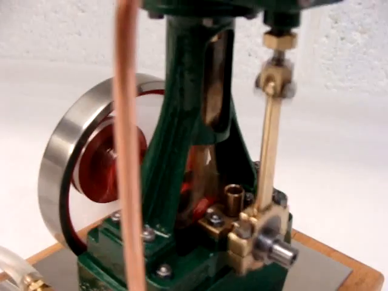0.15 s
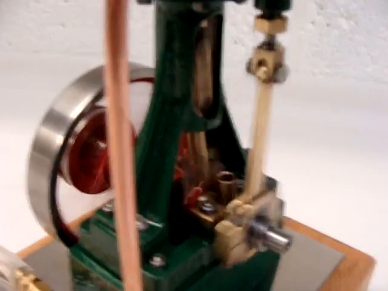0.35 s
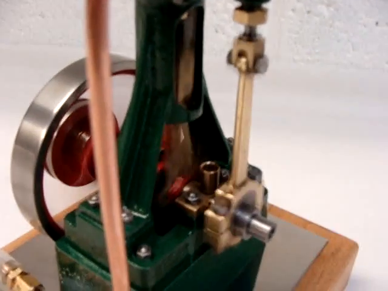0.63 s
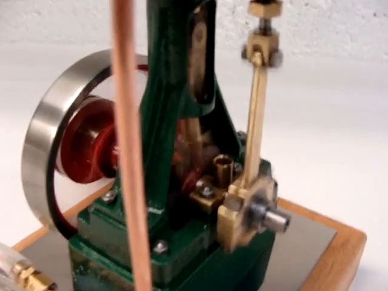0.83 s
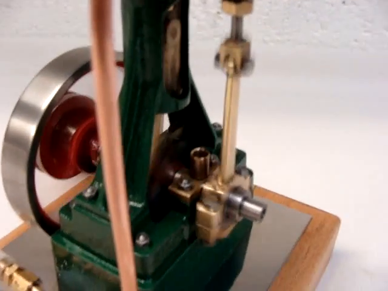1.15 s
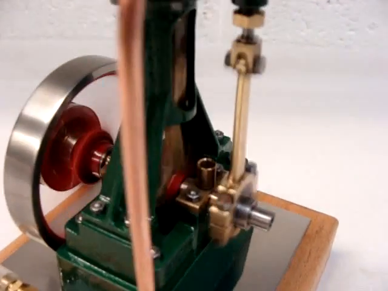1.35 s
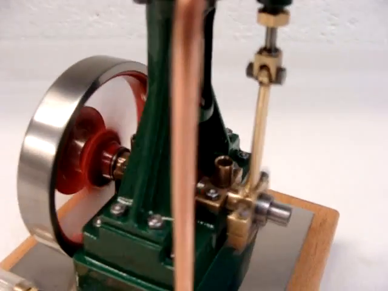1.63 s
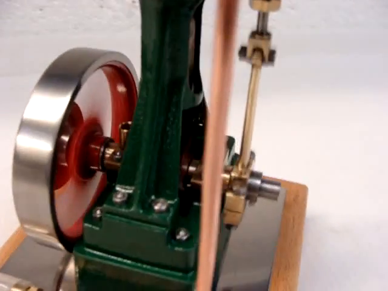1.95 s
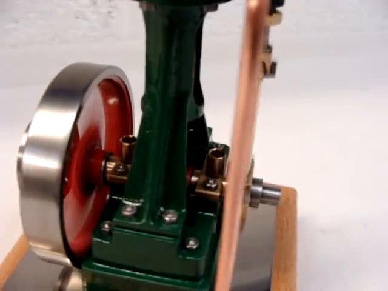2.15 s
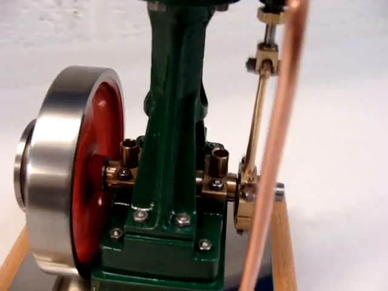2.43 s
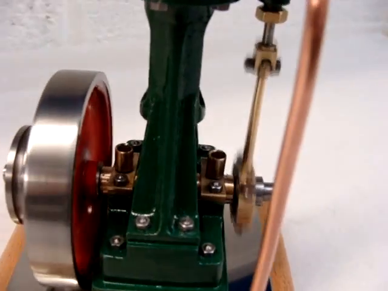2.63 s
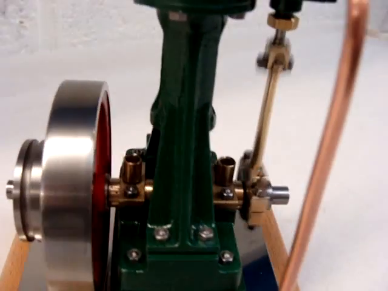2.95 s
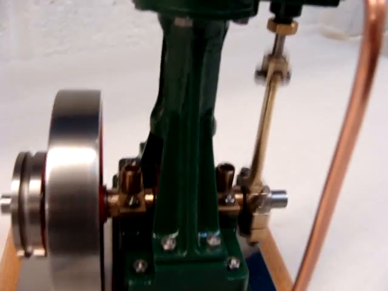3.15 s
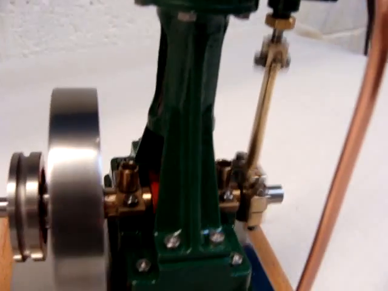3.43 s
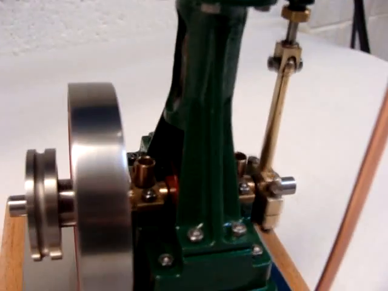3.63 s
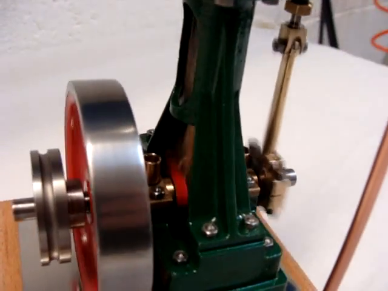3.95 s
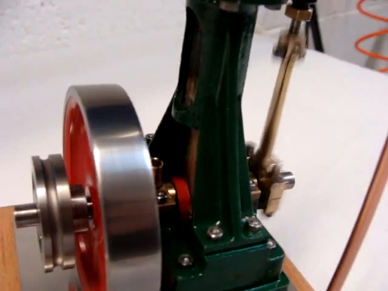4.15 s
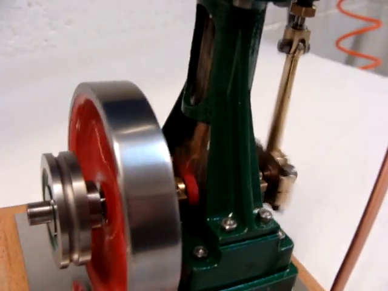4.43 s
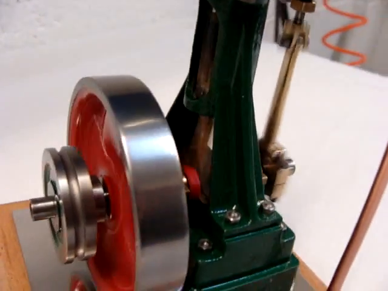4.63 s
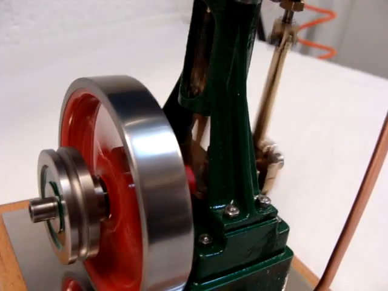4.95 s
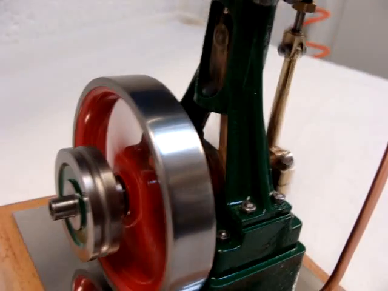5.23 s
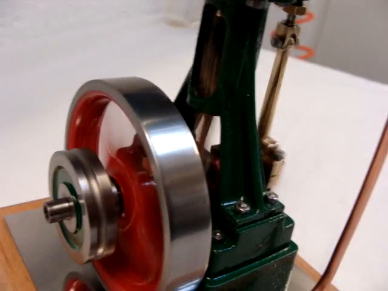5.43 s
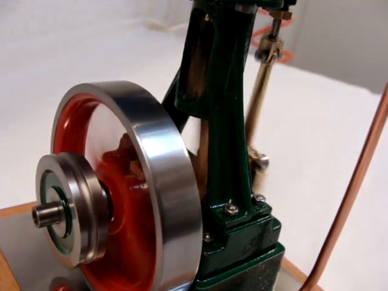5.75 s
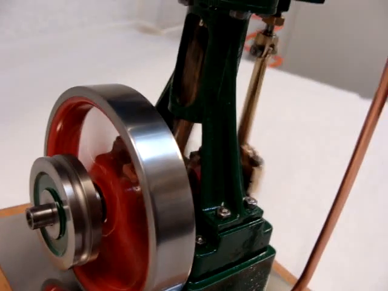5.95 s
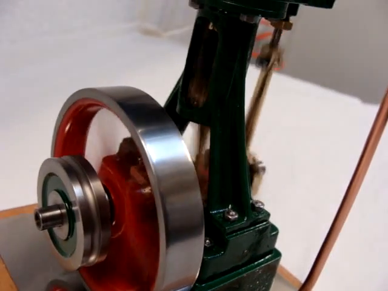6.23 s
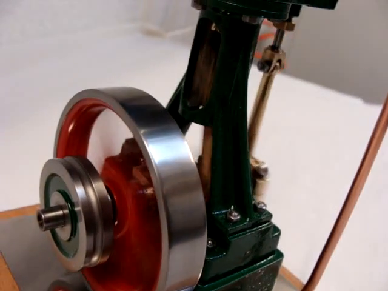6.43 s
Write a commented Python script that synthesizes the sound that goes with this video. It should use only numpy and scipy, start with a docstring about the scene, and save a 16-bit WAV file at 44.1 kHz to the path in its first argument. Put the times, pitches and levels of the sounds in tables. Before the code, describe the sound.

A small model engine is already running at the start and keeps an almost constant speed to the end at about 6.6 seconds, nearly eleven turns a second. Each turn gives two quick, bright, fluttering puffs of air, a raspy midrange rub of sliding metal with a faint rising chirp, and a cluster of dull knocks ringing in the frame and wooden base. From 0 to 2 seconds the sharp hiss is most prominent, with soft low buffets around 0.2 and 1. Towards 3.7 the knocking grows closer and fuller; the hiss thins after about 4.3. A stronger low buffet passes near 4.8, and the knocks dip around 5, then return by 5.6. Three tiny dry ticks come at 5.9, then a sharp, hard, bouncing clack at 6.3 with a brief room echo. Low room noise lies beneath; the engine never stops.

```python
"""Model steam engine on compressed air

A small upright engine runs at about 650 turns a minute while the listening point moves round it; a low room noise
lies beneath. Crank angle times two exhaust puffs a turn, a leak past the valve (both resonant, fluttering noise),
the rub and chirp of the slides, and bearing knocks that ring the frame and wooden base. Draughts of exhaust buffet
the microphone at times. Near the end come three small ticks and one sharp, bouncing clack in the room.
"""
import sys
import numpy as np
from scipy import signal
from scipy.fft import rfft, irfft
from scipy.io import wavfile

SR = 44100
rng = np.random.default_rng(int(sys.argv[2]) if len(sys.argv) > 2 else 0)


def persist_wave(psi):
    """Save psi, clipped to +-1, as 16-bit WAV."""
    counts = np.round(np.clip(psi, -1, 1) * 32767).astype(np.int16)
    wavfile.write(sys.argv[1], SR, np.atleast_2d(counts).T)


N = 290619
T = np.arange(N) / SR
HZ = np.fft.rfftfreq(N, 1 / SR)


def amp(db):
    """Decibels to gain."""
    return 10 ** (np.asarray(db) / 20)


def evened(x):
    """Scales to rms 1."""
    return x / np.sqrt(np.mean(x ** 2) + 1e-20)


def curve(rows):
    """Joins table rows linearly in time: one curve per column."""
    time_s, *columns = np.transpose(rows)
    return [np.interp(T, time_s, column) for column in columns]


def coloured(points):
    """Noise of rms 1 with the given spectrum, interpolated over log frequency."""
    hz, db = np.transpose(points)
    spectrum_db = np.interp(np.log(HZ + 1), np.log(hz + 1), db)
    return evened(irfft(rfft(rng.standard_normal(N)) * amp(spectrum_db), N))


def band(x, hz, width_hz):
    """Steep-sided resonance, 12 dB down at width_hz from its centre; rms 1."""
    response = 1 / (1 + ((HZ - hz) / width_hz) ** 2) ** 2
    return evened(irfft(rfft(x) * response, N))


def wander(rate_hz):
    """Random drift of rms 1, mostly slower than the given rate."""
    return band(rng.standard_normal(N), 0, rate_hz)


def ring(modes):
    """Response of an object to one blow: a sum of decaying modes."""
    t = T[:SR // 2]
    return sum(amp(db - 60 * t / t60_s) * np.cos(2 * np.pi * hz * t) for hz, db, t60_s in modes)


def add(mix, time_s, sound):
    """Mixes a sound in at a time."""
    part = mix[max(round(time_s * SR), 0):][:len(sound)]
    part += sound[:len(part)]


def small_source(x, corner_hz):
    """A small body hardly radiates the deep bass: high-pass."""
    return signal.sosfilt(signal.butter(3, corner_hz, "highpass", fs=SR, output="sos"), x)


def lengths_from(crank, angle, length):
    """Signed distance from the nearest pass of a crank angle, in event lengths (both in turns)."""
    return ((crank - angle + .5) % 1 - .5) / length


def surface(crank, count):
    """Fixed bumps on the running surfaces, met again every turn."""
    return evened(np.interp(crank, np.arange(count) / count, rng.standard_normal(count), period=1))


def strokes(crank, rows, attack_turns, release_turns, shut_db):
    """Gain over each turn: every stroke swells, sags and dies away above a floor of shut_db."""
    power = amp(shut_db) ** 2
    for start, length, db, sag_db in rows:
        since = (crank - start + .25) % 1 - .25
        opening = 1 + np.tanh(since / attack_turns)
        closing = 1 - np.tanh((since - length) / release_turns)
        level_db = db - sag_db * np.clip(since / length, 0, 1) ** 2
        power = power + (opening * closing / 4 * amp(level_db)) ** 2
    return np.sqrt(power)


def radiate(drive, resonances, view):
    """Each resonance beams its own way, so colour shifts with view; overall gain is evened out."""
    gains = np.array([amp(np.interp(view, np.arange(3), row[2:])) for row in resonances])
    bands = np.array([band(drive, row[0], row[1]) for row in resonances])
    return (gains * bands).sum(0) / np.linalg.norm(gains, axis=0)


# room noise spectrum: (frequency [Hz], density [dB per Hz])
FLOOR_SPECTRUM = [(20, 6.5), (45, -7.5), (90, 2.5), (250, 2), (600, 3), (900, 4.5), (3000, -11.5),
                  (10000, -24)]


def room_noise():
    """Steady noise with the room's spectrum."""
    return coloured(FLOOR_SPECTRUM)


def rumble(drift_db, rate_hz):
    """Faint low rumble that comes and goes."""
    return evened(band(rng.standard_normal(N), 25, 25) * amp(drift_db * wander(rate_hz)))


# contacts of a hard, bouncing thing: (time [s], level [dB])
CLACK_CONTACTS = [(6.280, -13.5), (6.286, -23.5), (6.297, -15.5), (6.322, -34)]
# spectrum of its wash: (frequency [Hz], density [dB per Hz])
CLACK_SPECTRUM = [(150, -35), (350, -13.5), (600, -5.5), (850, -1), (950, -18), (1150, -9), (1400, -13.5),
                  (2100, -9), (2600, -10.5), (3000, -4.5), (4050, -11), (4500, -2), (5300, -12.5),
                  (8000, -20.5)]
# modes of the object: (frequency [Hz], level [dB], t60 [s])
CLACK_RING = [(600, -7, .2), (648, -2, .22), (744, -4, .27), (808, -4, .42), (839, -4, .3), (1177, -5, .26),
              (2943, -4, .2), (3004, -8, .25), (3600, -6, .2), (4447, -3, .2)]


def clack(t60_s, rise_s, ring_db):
    """Each contact returns from the walls as a dense, dying wash; the first also rings the object."""
    out = np.zeros(N)
    for time_s, db in CLACK_CONTACTS:
        envelope = amp(-60 * T / t60_s) * (1 - np.exp(-T / rise_s))
        add(out, time_s, amp(db) * coloured(CLACK_SPECTRUM) * envelope)
    add(out, CLACK_CONTACTS[0][0], amp(ring_db) * ring(CLACK_RING))
    return out


# small dry ticks close by: (time [s], level [dB])
TICK_TIMES = [(5.913, -17), (5.940, -18), (5.9627, -15.5)]
# modes of a tick: (frequency [Hz], level [dB], t60 [s])
TICK_RING = [(247, -7, 0.0099), (515.7, -3.5, 0.0051), (930, -8, 0.0051), (3260, 0, 0.0037)]


def ticks():
    """Three short dull rings; a soft contact takes off their edge."""
    out = np.zeros(N)
    for time_s, db in TICK_TIMES:
        add(out, time_s, amp(db) * ring(TICK_RING))
    soft = signal.sosfilt(signal.butter(4, 3800, fs=SR, output="sos"), out)
    return small_source(soft, corner_hz=130)


# passes through the exhaust draught: (middle time [s], half length [s], level [dB])
DRAUGHT_PASSES = [(.2, .25, -53), (1.0, .45, -54), (3.9, .15, -56), (4.8, .17, -46)]


def draught(crank, angle, length, hz, width_hz):
    """Once a turn a puff of air buffets the microphone as it passes through the exhaust draught."""
    reach = sum(amp(db) * np.exp(-((T - middle_s) / half_s) ** 2) for middle_s, half_s, db in DRAUGHT_PASSES)
    puff = np.exp(-lengths_from(crank, angle, length) ** 2)
    return reach * puff * band(rng.standard_normal(N), hz, width_hz)


def squeak(crank, angle, length, hz, glide_hz):
    """Faint rising chirp of a sliding joint, once a turn: a gliding sine."""
    along = lengths_from(crank, angle, length)
    pitch_hz = hz * (1 + .03 * wander(6.8)) + glide_hz * np.clip(along, -2, 2)
    envelope = np.exp(-along ** 2) * amp(2.0 * wander(7.1))
    return envelope * np.sin(2 * np.pi * np.cumsum(pitch_hz) / SR)


# sliding parts bear on their guides: (crank angle [turns], length [turns], level [dB], sag [dB])
RUB_STROKES = [(0.866, .37, 1.5, 4), (0.263, 0.056, 1.5, -1), (0.34, 0.44, -5.5, -0.5),
               (0.585, 0.091, -3.5, -2)]


def slide_load(crank):
    """Load on the guides over each turn."""
    return strokes(crank, RUB_STROKES, attack_turns=0.019, release_turns=0.037, shut_db=-10.5)


# slide resonances: (frequency [Hz], width [Hz], valve side [dB], broadside [dB], flywheel side [dB])
SLIDE_RESONANCES = [(1038, 92, -15.5, -12, -19.5), (1346, 210, -1.5, -4.5, -2.5), (1818, 453, 6.5, 0, 4),
                    (2130, 120, -2, -5, -26), (2322, 160, -17, -9.5, -1), (2704, 600, -0.5, -1.5, 1.5),
                    (3650, 1300, -3, -9, -5.5)]


def slides(crank, view, load, repeating, gritty_db):
    """Crosshead and eccentric rub: partly the same bumps each turn, partly fresh grit."""
    grit = rng.standard_normal(N) * amp(gritty_db * wander(500))
    rub = evened(grit) + repeating * surface(crank, count=1500)
    return evened(radiate(rub * load, SLIDE_RESONANCES, view))


# bearing play taken up as the piston reverses: (crank angle [turns], blow [dB], contact [ms])
BEARING_BLOWS = [(.246, 0, .3), (.264, 8.8, 1.9), (.324, 9.8, 1.13), (.426, -2, .8), (.769, -4, .3),
                 (.83, -2.7, .46), (.843, 6.7, 1.1), (.919, 0, .3)]
# modes of frame and wooden base: (frequency [Hz], level [dB], t60 [s])
FRAME_RING = [(130, -18, 0.14), (150.9, -16.5, 0.23), (191, -7, 0.041), (410, 0, 0.02), (420, -18.5, 0.034),
              (492, -0.5, 0.029), (589, 2.5, 0.039), (1066, -4, 0.02)]


def knocks(crank, load, uneven_db, loose_s, rumble_db):
    """Bearing blows and rough running ring the frame; a long contact gives a dull thud."""
    force = np.zeros(N)
    turns = np.arange(-1, np.ceil(crank[-1]))
    t_ms = 1000 * T[:400] - 4  # blow peaks at 0
    for angle, db, contact_ms in BEARING_BLOWS:
        blow = np.exp(-np.pi * (t_ms / contact_ms) ** 2)
        blow /= blow.sum()
        times_s = np.interp(turns + angle, crank, T, left=-1, right=-1)  # -1: outside the scene
        for time_s, (size, late) in zip(times_s, rng.standard_normal((len(times_s), 2))):
            if time_s > 0:
                start_s = time_s + t_ms[0] / 1000 + loose_s * late
                add(force, start_s, -amp(db + uneven_db * size) * blow)
    force += amp(rumble_db) * surface(crank, count=200) * load
    ringing = signal.fftconvolve(force, ring(FRAME_RING))[:N]
    return evened(small_source(ringing, corner_hz=60))


def air(valve, view, puffs, resonances, attack_turns, release_turns, shut_db, flutter_db, flutter_hz,
        uneven_db, seating, sag_hz):
    """A fluttering jet, let through by the valve, hisses in narrow passages; no two puffs are alike."""
    tightness = np.maximum(1 + seating * wander(12.0), .5)  # how well the valve shuts
    opening = strokes(valve, puffs, attack_turns, release_turns, shut_db)
    flow = opening ** tightness * amp(uneven_db * wander(13))
    turbulence = amp(flutter_db * wander(flutter_hz)) * rng.standard_normal(N)
    hiss = radiate(flow * turbulence, resonances, view)
    shift_hz = -sag_hz * (1 - np.minimum(2 * flow, 1))  # a jet running out drops in pitch
    turning = np.exp(2j * np.pi * np.cumsum(shift_hz) / SR)
    return evened((signal.hilbert(hiss) * turning).real)


# two long puffs a turn, each after a short spurt; played by leak and exhaust:
# (crank angle [turns], length [turns], exhaust level [dB], leak level [dB], sag [dB])
VALVE_PUFFS = [(0.272, 0.024, -1.5, 6, 1), (0.352, 0.39, 1.5, 0.5, 7), (0.783, .021, -12, -3, 2),
               (.856, 0.36, -3.5, 1.5, 1.5)]
# leak resonances: (frequency [Hz], width [Hz], valve side [dB], broadside [dB], flywheel side [dB])
LEAK_RESONANCES = [(4500, 1500, -12, -13, -9), (4880, 770, -44.5, -18.5, -8), (5670, 165, -11, -9, -11),
                   (5877, 314, 5.5, -6, -4), (6436, 740, -1, -5, 0), (9606, 290, -8.5, -12, -3.5)]


def leak(valve, view, sag_share, outlasts):
    """Air slips past the valve at nearly steady supply pressure and outlasts each puff a little."""
    puffs = [(angle, outlasts * length, db, sag_share * sag_db) for angle, length, _, db, sag_db in VALVE_PUFFS]
    return air(valve, view, puffs, LEAK_RESONANCES, attack_turns=0.0116, release_turns=0.01775, shut_db=-18.5,
               flutter_db=0.54, flutter_hz=200, uneven_db=0.92, seating=0.57, sag_hz=39.37)


# exhaust resonances: (frequency [Hz], width [Hz], valve side [dB], broadside [dB], flywheel side [dB])
EXHAUST_RESONANCES = [(7170, 540, -20, -2, -15), (7386, 410, 0.5, -13.5, -6), (7888, 310, 2, -4.5, -0.5),
                      (8490, 430, -6.5, -7.5, -5), (9090, 540, -13, -9.5, -14), (9920, 170, -13, -13, -10)]


def exhaust(valve, view):
    """The cylinder empties, so each puff fades as the pressure falls."""
    puffs = [(angle, length, db, sag_db) for angle, length, db, _, sag_db in VALVE_PUFFS]
    return air(valve, view, puffs, EXHAUST_RESONANCES, attack_turns=.013, release_turns=0.014, shut_db=-28,
               flutter_db=1.5, flutter_hz=200, uneven_db=0.85, seating=0.17, sag_hz=457.4)


# flywheel speed: (time [s], speed [turns per s])
FLYWHEEL_SPEED = [(0, 10.802), (1.05, 10.877), (1.95, 10.749), (2.4, 10.797), (4.3, 10.816), (6.05, 10.91),
                  (6.6, 10.815)]


def crank_angle(start_turns):
    """Integrates flywheel speed to crank angle in turns."""
    speed_hz, = curve(FLYWHEEL_SPEED)
    return start_turns + np.cumsum(speed_hz) / SR


# listening point: (time [s], side [0 valve, 1 broadside, 2 flywheel])
LISTENING_SIDE = [(0, 0), (1.8, 0.44), (2.7, 1.03), (4.1, 0.86), (5.0, 2.34)]
# nearness to the frame: (time [s], level [dB])
FRAME_NEARNESS = [(0, -6.5), (1.15, -6.5), (3.7, 0), (4.5, -2), (4.95, -4.5), (5.65, -1), (6.6, -3.5)]
# reach of the two jets: (time [s], exhaust level [dB], leak level [dB])
JET_LEVELS = [(0, -23, -25.5), (1.1, -25.5, -27), (1.8, -23.5, -28), (2.65, -27, -32.5), (3.75, -27, -28),
              (4.45, -32.5, -29.5), (4.95, -33, -34), (5.55, -29.5, -31.5), (6.6, -30.5, -34.5)]


def scene():
    """Crank angle drives every sound of the engine; room sounds are added."""
    crank = crank_angle(start_turns=-.214)
    valve = crank + .006 * wander(15)  # slack in the valve gear [turns rms]
    load = slide_load(crank)

    view, = curve(LISTENING_SIDE)
    near_db, = curve(FRAME_NEARNESS)
    exhaust_db, leak_db = curve(JET_LEVELS)
    slide_db = -36.5 + 0.63 * near_db  # slides follow nearness only in part
    knock_db = -40 + near_db

    room = amp(-51) * room_noise() + amp(-81) * rumble(drift_db=2, rate_hz=6)
    handling = ticks() + clack(t60_s=0.24, rise_s=0.0009, ring_db=-22)
    buffets = draught(crank, angle=.65, length=.16, hz=25, width_hz=25)
    chirp = amp(slide_db - 4) * squeak(crank, angle=0.67, length=0.037, hz=1076, glide_hz=71.0)
    rub = amp(slide_db) * slides(crank, view, load, repeating=0.39, gritty_db=1.5)
    thuds = amp(knock_db) * knocks(crank, load, uneven_db=1.37, loose_s=.00008, rumble_db=-47)
    jets = amp(leak_db) * leak(valve, view, sag_share=0.23, outlasts=1.085)
    jets += amp(exhaust_db) * exhaust(valve, view)
    return (room + handling + buffets + chirp + rub + thuds + jets)[None]


def record(dry):
    """Band limit of the microphone: linear-phase low-pass at 10.1 kHz."""
    lowpass = signal.firwin(1023, 10100, window=("kaiser", 9), fs=SR)
    return signal.oaconvolve(dry, lowpass[None], "same")


dry = scene()
out = record(dry)
persist_wave(out)
```